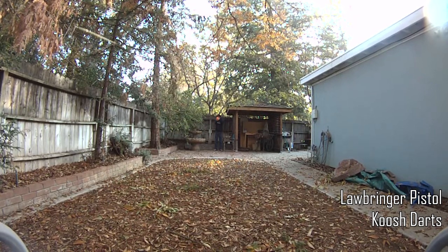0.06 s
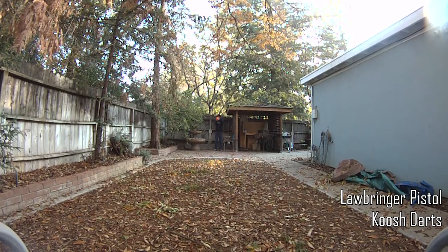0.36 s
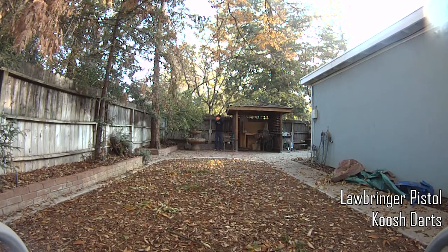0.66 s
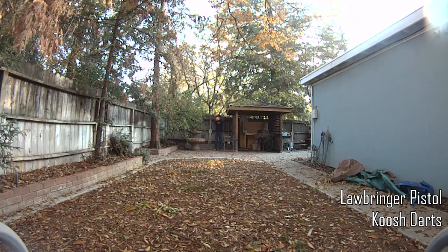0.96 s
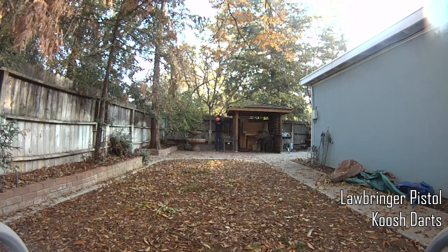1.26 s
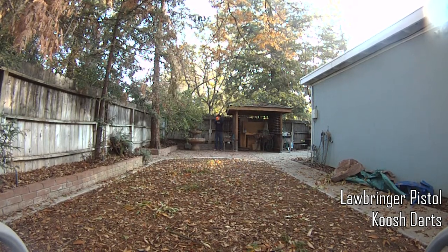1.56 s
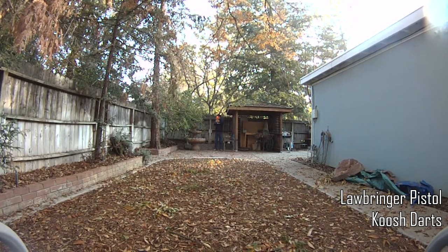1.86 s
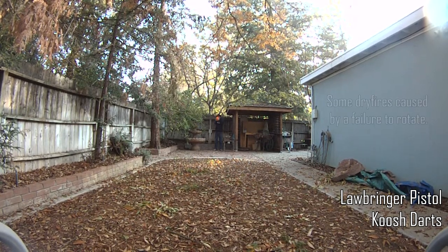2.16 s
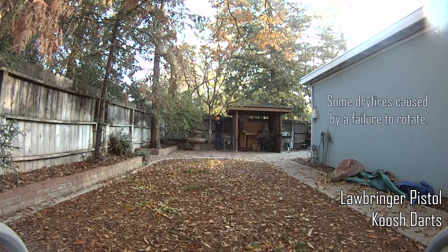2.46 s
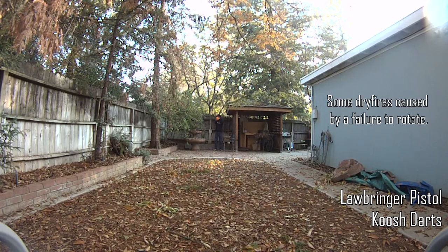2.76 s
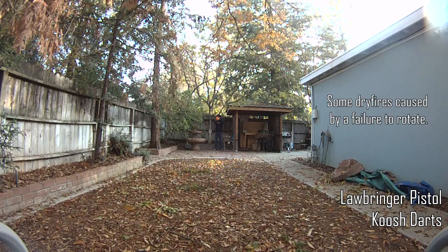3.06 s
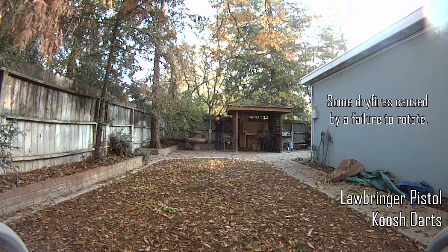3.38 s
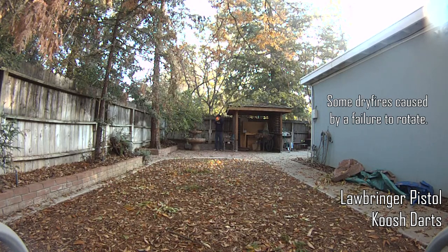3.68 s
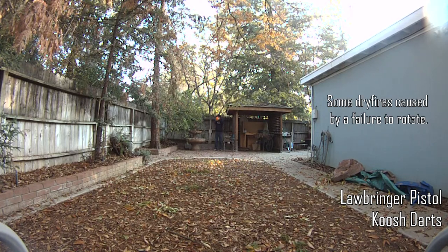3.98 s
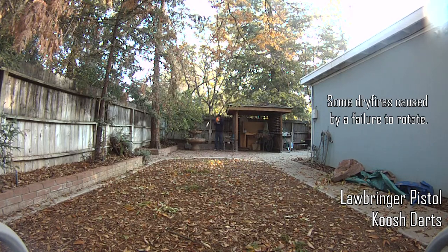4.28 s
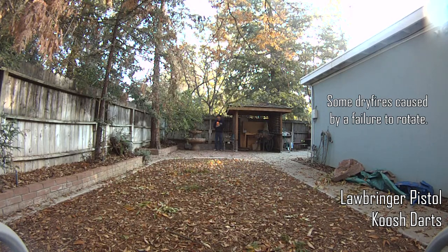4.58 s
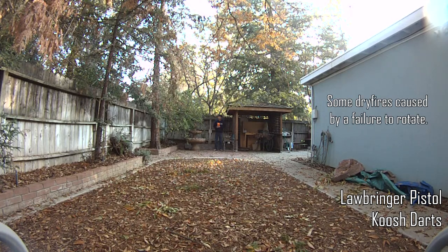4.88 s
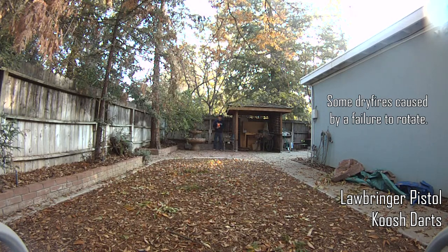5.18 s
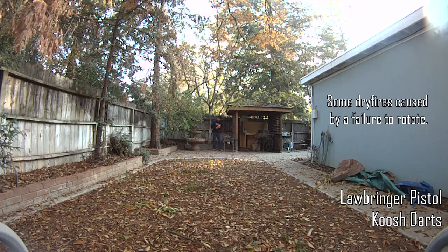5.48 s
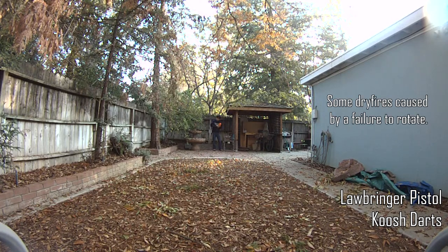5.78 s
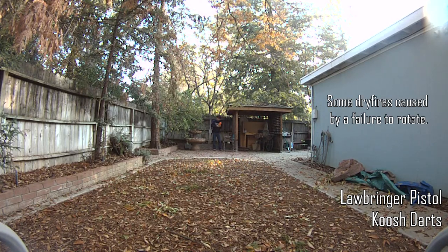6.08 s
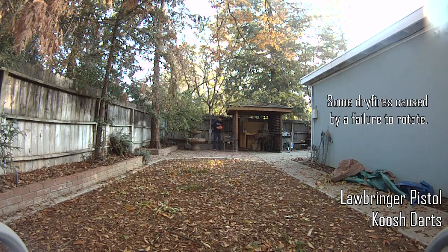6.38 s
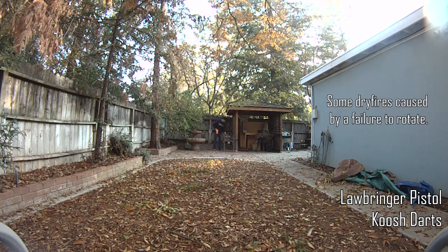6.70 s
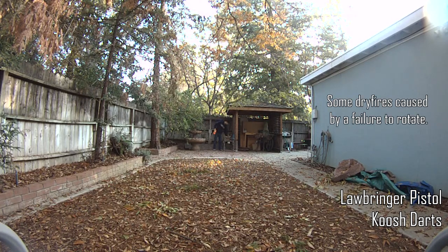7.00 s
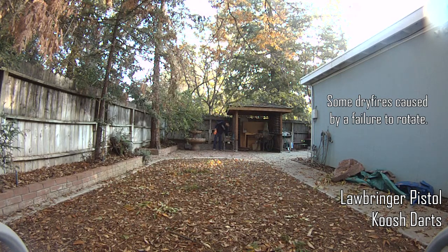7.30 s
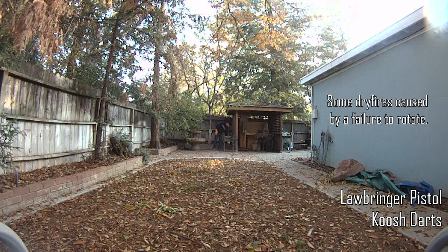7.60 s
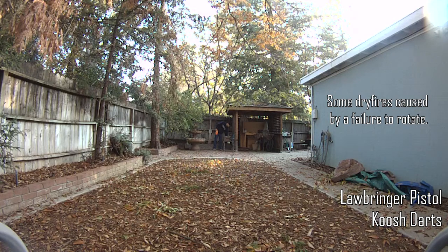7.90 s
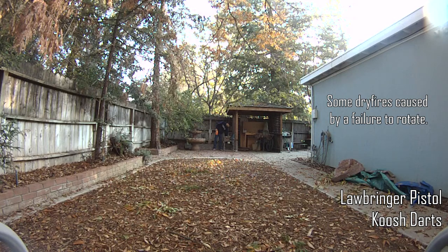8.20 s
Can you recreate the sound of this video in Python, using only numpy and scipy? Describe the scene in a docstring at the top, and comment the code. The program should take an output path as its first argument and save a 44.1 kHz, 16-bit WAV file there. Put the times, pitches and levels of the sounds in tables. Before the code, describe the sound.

A spring-air toy pistol fires seven times in about four seconds, some pops sharp and empty, others duller, with small ratchet clicks between them. Foam darts thud and bounce close to the microphone in crackling dry leaves, and one strikes a hollow object that rings briefly. A few light clicks and faint distant footsteps follow. A low hum and soft outdoor air fill the backyard.

```python
"""A spring-air toy pistol is cocked and fired across a fenced backyard: its ratchet clicks and its
plunger slams home with a pop, sometimes on an empty chamber. Foam darts thud down close by and bounce
in crackling dry leaves, and a hollow object rings when struck. There are a few light taps, then the
shooter steps away. A machine hums faintly under the murmur of the outdoor air."""
import sys
import numpy as np
from scipy import signal
from scipy.fft import rfft, irfft, next_fast_len
from scipy.io import wavfile
from scipy.ndimage import uniform_filter1d, map_coordinates

SR = 44100
rng = np.random.default_rng(int(sys.argv[2]) if len(sys.argv) > 2 else 0)


def dump(signal):
    """Clip the signal to [-1, 1] and save it as 16-bit WAV at the path in sys.argv[1]."""
    limited = np.clip(np.atleast_2d(signal).T, -1, 1)
    pcm = np.round(limited * 32767).astype(np.int16)
    wavfile.write(sys.argv[1], SR, pcm)


N = 372629
T = np.arange(SR * 3 // 4) / SR  # time within one short sound [s]
HZ = np.fft.rfftfreq(2 ** 13, 1 / SR)  # frequencies at which a tone colour is drawn

# where the plastic shell and barrel ring: (frequency [Hz], width [Hz], boost [dB])
SHELL = [(676, 31, 3), (940, 34, 3), (1053, 67, 3.5), (1416, 39, 7), (1730, 54, 5), (2020, 16, 5.5),
         (2253, 85, 5.5)]


def shots():
    """The plunger rushes forward and slams home; a dart in the barrel makes the pop deeper and duller."""
    # trigger pulls: (time [s], level [dB], dart in the chamber [0-1])
    pulls = [(0.1075, 3.5, 0.12), (0.7091, -7, 0.84), (1.2197, 2.5, 0.08), (2.2993, -8, 0.88),
             (2.811, 3.5, 0.12), (3.5296, -6, 0.88), (4.008, -3, 0.83)]
    # tone colour of an empty chamber's pop: (frequency [Hz], level [dB])
    empty_pop = [(60, -38), (200, -38.5), (350, -18), (520, -9), (720, 0.5), (1100, -4), (1600, -15),
                 (2200, -20.5), (2900, -32), (4200, -41), (5300, -35.5), (7000, -46.5), (10000, -45.5),
                 (15000, -61)]
    # tone colour of a dart leaving the barrel: (frequency [Hz], level [dB])
    dart_pop = [(60, -31), (150, -9), (330, -4.5), (480, -8), (650, 1.5), (900, -10), (1300, -12),
                (1700, -16), (2300, -23.5), (3200, -37.5), (4500, -45.5), (5400, -36), (7000, -46.5),
                (15000, -60)]
    # the air in the barrel rings on after the pop: (pitch [Hz], level [dB], fade time [s])
    barrel_tones = [(666, -35.5, 0.6), (722, -39.5, 0.69)]
    barrel = sum(amp(db) * sine(hz) * fade(t60) for hz, db, t60 in barrel_tones)
    low_share = 1 / (1 + (HZ / 1900) ** 4)  # the lows are a puff of air, the rest is rattling plastic
    out = np.zeros(N)
    for start, db, dart in pulls:
        colour = (1 - dart) * curve(empty_pop, HZ) + dart * curve(dart_pop, HZ) + boost(SHELL)
        puff = pulse(colour + 20 * np.log10(low_share + 1e-4), swell_hz=830, swell_stages=5)
        rattle = pulse(colour + 20 * np.log10(1 - low_share + 1e-4))
        pop = through(puff, yard(np.ones(1), near_db=-4, tail_db=-2))
        rattle_echoes = yard(burst(t60=0.018, rise_s=0.0013), near_db=0.5, tail_db=-1)
        pop += amp(-17.5 - 2 * dart) * through(rattle, rattle_echoes)
        add(out, start, amp(db + 7) * pop)
        rush = through(puff + amp(-29) * rattle, burst(t60=0.12, rise_s=0.0025))
        add(out, start - 0.004 - 0.00209 * dart, amp(db + 3 + 5.2 * dart) * rush)
        add(out, start, amp(db + 1.9 * dart) * barrel * swell(0.012))
    return out


def clicks():
    """The ratchet scrapes and catches as the cylinder turns; a harder catch makes a brighter click."""
    # the trigger's first take-up, then cocking and ratchet clicks: (time [s], level [dB])
    catches = [(.073, -42), (0.4223, -28.5), (.928, -29), (2.517, -29), (3.151, -35.5), (3.716, -39),
               (4.786, -40.5), (5.079, -34.5), (5.86, -38.5), (5.9115, -31.5), (5.9153, -29.5),
               (6.158, -46), (6.542, -39), (6.705, -37.5)]
    # tone colour of a click: (frequency [Hz], level [dB])
    click_colour = [(200, -23), (400, -21.5), (680, -2), (900, -4), (1450, -8.5), (2100, -16), (3500, -27),
                    (4700, -32), (5150, -28), (6000, -33.5), (9000, -38), (14000, -48)]
    # the ping of the ratchet's spring: (frequency [Hz], width [Hz], boost [dB])
    spring = [(5000, 180, 5.5)]
    colour = curve(click_colour, HZ) + 0.93 * boost(SHELL) + boost(spring)
    out = np.zeros(N)
    for start, db in catches:
        treble_db = 1.9 * (db + 31) * HZ / (HZ + 2500)
        snap = pulse(colour + treble_db)
        scrape = yard(burst(t60=0.03, rise_s=0.0019), near_db=5.5, tail_db=2)
        add(out, start - 0.003, amp(db + 12.5) * through(snap, scrape))
    return out


def darts():
    """A soft foam head thuds down, dry leaves crack under it and things nearby scatter the sound."""
    # landings and bounces: (time [s], level [dB], thud pitch [Hz], crackle [dB], crackle treble [dB])
    landings = [(.067, -33, 205, -28, -25), (1.1696, -1, 410, -32.5, -17), (1.3511, -14.5, 432, -2.5, 11.5),
                (1.485, -26.5, 520, -30, -32), (1.4891, -16.5, 245, -22, -39), (1.636, -29, 385, -37, -13),
                (2.7869, -16, 690, -26, -13), (4.4461, -6.5, 670, -31.5, 6), (4.6654, -44, 426, -14, -13)]
    # tone colour of the soft head's push: (frequency [Hz], level [dB])
    foam_colour = [(10, -43), (50, -16), (90, -16.5), (140, 1), (230, -1), (900, 5), (1400, 9), (2300, 2),
                   (4500, 4.5), (14000, -42)]
    # tone colour of a dry leaf cracking: (frequency [Hz], level [dB])
    leaf_colour = [(60, -38.5), (300, -17), (1100, 4.5), (1750, 18), (2700, -4), (3600, -0.5), (4600, -2),
                   (5800, 4), (7700, -14.5), (9500, -4.5), (12500, -14), (15000, -27)]
    # where the crackle rings: (frequency [Hz], width [Hz], boost [dB])
    leaf_rings = [(1945, 68, 4), (3760, 120, 5.5), (5740, 250, 0.5), (6480, 260, 8)]
    push = pulse(curve(foam_colour, HZ), swell_hz=1090, swell_stages=2)
    out = np.zeros(N)
    for start, db, thud_hz, crackle_db, treble_db in landings:
        thud = through(sine(thud_hz) * fade(0.0097), push)  # the foam damps every thud alike
        thud /= np.abs(thud).max()
        echoes = burst(t60=0.079, rise_s=0.0022) + amp(-10) * burst(t60=0.44, rise_s=0.0082)
        scatter_gain = np.hypot(amp(db - 7.5), amp(-38.5))  # faint, far landings have a larger share
        leaf = pulse(curve(leaf_colour, HZ) + boost(leaf_rings) + treble_db * HZ / (HZ + 3500))
        cracks = burst(t60=0.01, rise_s=0.0028) + amp(-31) * burst(t60=0.051, rise_s=0.004)
        crackle = amp(crackle_db + 21) * through(cracks, leaf)
        contact_tick = amp(-18) * fade(0.0019)
        add(out, start, amp(db) * (thud + crackle + contact_tick) + scatter_gain * through(thud, echoes))
    return out


def hollow_object():
    """Struck by a dart, it rings; two close low tones beat, so the note swells, vanishes and returns."""
    # dart strikes: (time [s], level [dB])
    knocks = [(1.4899, -35), (4.4461, -10)]
    # the object's own tones: (pitch [Hz], level [dB], fade time [s])
    tones = [(178, -24, 0.46), (211, -19.5, 0.35), (400, -10.5, 0.17), (452, 0, 0.11), (538, -1, 0.033),
             (597, -21.5, 0.13), (693, -17.5, 0.17), (790, -10, 0.09), (940, 1.5, 0.067),
             (1065, -3.5, 0.073), (1250, -11.5, 0.11), (1354, -5, 0.056)]
    body = sum((-1) ** k * amp(db) * sine(hz) * fade(t60) for k, (hz, db, t60) in enumerate(tones))
    low_pair = sine(330) * np.sin(np.pi * T / 0.085) * fade(0.21)  # one beat every 0.085 s
    ring = amp(-2) * body * (1 - np.exp(-(T / 0.0018) ** 2))
    ring += amp(6.5) * low_pair * (1 - np.exp(-(T / 0.029) ** 2))  # the pair builds up more slowly
    out = np.zeros(N)
    for start, db in knocks:
        add(out, start, amp(db) * ring)
    return out


def taps():
    """A light tap rings briefly at one pitch and scatters off the things around it."""
    # taps on something hard: (time [s], level [dB], pitch [Hz])
    touches = [(.367, -36, 1160), (3.3208, -42.5, 645), (4.532, -36.5, 1260)]
    out = np.zeros(N)
    for start, db, hz in touches:
        ring = sine(hz) * fade(0.038)
        scatter = amp(-2.5) * through(ring, burst(t60=0.1, rise_s=0.0014))
        add(out, start, amp(db) * (ring + scatter))
    return out


def steps():
    """Each distant step is a dull blow of the heel and a scuff of the sole."""
    # footfalls: (time [s], level [dB], scuff compared with heel [dB])
    footfalls = [(7.145, -40.5, -5.5), (7.381, -42, -7), (7.425, -38, -1), (7.521, -35.5, -8),
                 (7.654, -47, 0), (7.797, -43, -3), (7.87, -41.5, -9), (8.283, -31, -18.5)]
    # tone colour of the heel: (frequency [Hz], level [dB])
    heel = [(80, -38), (200, -6), (305, 4), (420, 6.5), (510, -13), (610, -2.5), (900, -22), (3000, -59)]
    # tone colour of the scuffing sole: (frequency [Hz], level [dB])
    scuff = [(300, -38), (700, -1), (1050, 11.5), (1500, -18), (3000, -27), (10000, -40)]
    out = np.zeros(N)
    for start, db, scuff_db in footfalls:
        foot = pulse(curve(heel, HZ)) + amp(scuff_db) * pulse(curve(scuff, HZ))
        echoes = yard(burst(t60=0.05, rise_s=0.0029), near_db=-7, tail_db=-5)
        add(out, start, amp(db + 16) * through(foot, echoes))
    return out


def machine_hum():
    """A distant machine throbs on a slowly sinking note while its overtones swell and waver."""
    # tones above the base note: (multiple of its pitch, level [dB])
    overtones = [(2, -6.5), (3, -1), (4, -7.5), (5, -14.5)]
    # how the overtones swell together: (time [s], level [dB])
    overtone_level = [(0, -65.5), (5.45, -59), (5.9, -66.5), (8.45, -66)]
    t = np.arange(N) / SR
    pitch_hz, base_db = 81.6 - 0.1 * t, -56 - 0.37 * t
    phase = 2 * np.pi * np.cumsum(pitch_hz) / SR + 0.1 * wobble(3.03)
    upper_db = np.interp(t, *np.transpose(overtone_level))
    upper = sum(amp(db + 2.65 * wobble(2.785)) * np.sin(multiple * phase + 2 * np.pi * rng.random())
                for multiple, db in overtones)
    throb_db = 2.4 * wobble(10)
    return np.sqrt(2) * (amp(base_db + throb_db) * np.sin(phase) + amp(upper_db) * upper)


def outdoor_air():
    """A low murmur drifts in level and slowly dies down under a steady hiss."""
    # tone colour of the air: (frequency [Hz], level [dB])
    air_colour = [(20, -15.5), (45, -14), (62, -17), (80, -11.5), (97, -3.5), (115, -11.5), (215, -8),
                  (280, -9.5), (470, -16.5), (650, -15), (1000, -18), (1500, -25), (4000, -29),
                  (15000, -34)]
    # how alike left and right sound: (frequency [Hz], likeness [0-1])
    likeness = [(100, 1), (350, .9975), (700, 0.99), (1200, 1), (2200, 0.93), (4970, 0.71), (15000, .54)]
    size = next_fast_len(N)
    hz = np.fft.rfftfreq(size, 1 / SR)
    spread = np.arccos(np.clip(curve(likeness, hz), 0, 1)) / 2
    spectrum = rfft(rng.standard_normal((2, size))) * amp(curve(air_colour, hz))
    spectrum *= [np.cos(spread), np.sin(spread)]  # the part both ears share, and the part that differs
    low_share = 1 / (1 + (hz / 1800) ** 2)
    murmur, hiss = (norm(irfft(spectrum * share, size)[:, :N]) * np.sqrt(N)
                    for share in (low_share, 1 - low_share))
    murmur_db = -55 - 0.3951 * np.arange(N) / SR + 1.23 * wobble(4.6)
    mid, side = amp(murmur_db) * murmur + amp(-65) * hiss
    return np.array([mid + side, mid - side])


def yard(direct, near_db, tail_db):
    """A sound with its wall echoes, quick scatter off the fence boards and a long tail from the trees."""
    # echoes off the ground, fence and house wall: (delay [s], level [dB])
    walls = [(.0015, -10.5), (.0043, -7.5), (.0114, -8), (.0165, -10), (.0292, -17), (.0432, -18),
             (.0525, -16.5)]
    # how long the tail lasts: (frequency [Hz], fade time [s])
    tail_times = [(150, 0.32), (600, 0.37), (1400, 0.51), (4000, 0.51), (12000, 0.25)]
    out = np.zeros(len(T))
    add(out, 0, direct)
    for delay, db in walls:
        add(out, delay, amp(db) * direct)
    hz, t, noise = signal.stft(rng.standard_normal(len(T)), SR, nperseg=256)
    decay = np.exp(-np.log(1000) * t / curve(tail_times, hz)[:, None])
    tail = signal.istft(noise * decay, SR)[1][:len(T)]
    add(out, 0.003, amp(near_db) * burst(t60=0.14, rise_s=0.0027))
    return out + amp(tail_db) * norm(tail * swell(0.0037))


def amp(db):
    """Turn decibels into a gain."""
    return 10 ** (np.asarray(db) / 20)


def norm(x):
    """Scale a sound to energy 1."""
    return x / np.sqrt(np.sum(x ** 2) + 1e-20)


def curve(points, hz):
    """Join (frequency, value) points on a log frequency axis and read the values at hz."""
    frequencies, values = np.transpose(points)
    return np.interp(np.log(hz + 1), np.log(frequencies + 1), values)


def boost(rings):
    """The decibels that ringing peaks add to a tone colour."""
    return sum(db / (1 + (2 * (HZ - hz) / width) ** 2) for hz, width, db in rings)


def wobble(per_second):
    """A smooth curve through this many random values a second."""
    values = rng.standard_normal(int(N * per_second / SR) + 4)
    return map_coordinates(values, [np.arange(N) * per_second / SR])


def sine(hz):
    """A short pure tone."""
    return np.sin(2 * np.pi * hz * T)


def fade(t60):
    """Die away by 60 dB in t60 seconds, the fade time."""
    return np.exp(-np.log(1000) * T / t60)


def swell(rise_s):
    """Grow from 0 towards 1, about two thirds of the way after rise_s."""
    return 1 - np.exp(-T / rise_s)


def burst(t60, rise_s):
    """Noise of energy 1 and even colour that swells and dies."""
    spectrum = rfft(rng.standard_normal(len(T)) * fade(1.25 * t60) * swell(rise_s))
    power = uniform_filter1d(np.abs(spectrum) ** 2, size=int(4 / t60) + 3)
    even_noise = irfft(spectrum / np.sqrt(np.abs(power) + 1e-12), len(T))
    return norm(even_noise * fade(5 * t60))  # the two fades together make t60


def pulse(colour_db, swell_hz=0, swell_stages=0):
    """A sharp pulse with this tone colour; swell stages make the part below swell_hz build up later."""
    cepstrum = irfft(np.log(amp(colour_db)))
    cepstrum[1:len(HZ) - 1] *= 2  # doubling one half and clearing the other packs the energy up front
    cepstrum[len(HZ):] = 0
    lag = np.exp(-2j * swell_stages * np.arctan2(HZ, swell_hz))
    wave = norm(irfft(np.exp(rfft(cepstrum)) * lag))
    return np.pad(wave, (0, len(T)))[:len(T)]


def through(x, ringing):
    """Pass one short sound through another's ringing."""
    return signal.fftconvolve(x, ringing)[:len(T)]


def add(track, start, x):
    """Mix x into the track at start seconds."""
    part = track[max(round(start * SR), 0):][:len(x)]
    part += x[:len(part)]


def scene():
    """All sources reach two close microphones; the right one is a touch more sensitive."""
    mix = shots() + clicks() + darts() + hollow_object() + taps() + steps() + machine_hum()
    return (mix + outdoor_air()) * amp([[-0.07], [0.07]])


def record(dry):
    """Clip the peaks at full scale, thin the deepest bass and cut the highest treble."""
    bass_hz, top_hz = 45, 15350
    bass_cut = signal.butter(2, bass_hz, "highpass", fs=SR, output="sos")
    thinned = signal.sosfilt(bass_cut, np.clip(dry, -1, 1))
    size = next_fast_len(N + SR)
    below_top = np.fft.rfftfreq(size, 1 / SR) < top_hz
    return irfft(rfft(thinned, size) * below_top, size)[:, :N]


dry = scene()
out = record(dry)
dump(out)
```